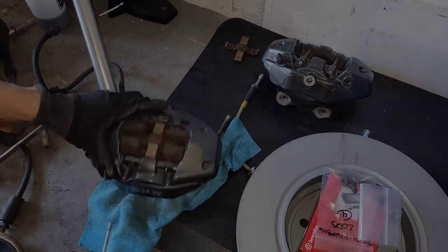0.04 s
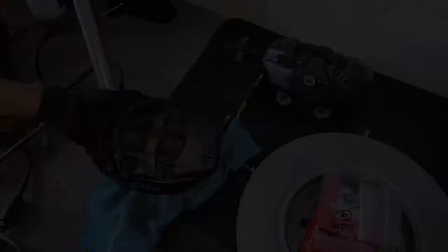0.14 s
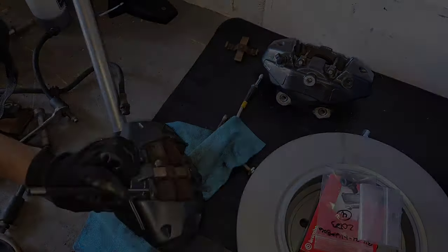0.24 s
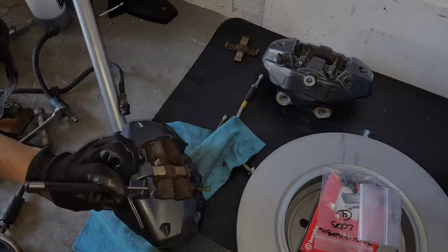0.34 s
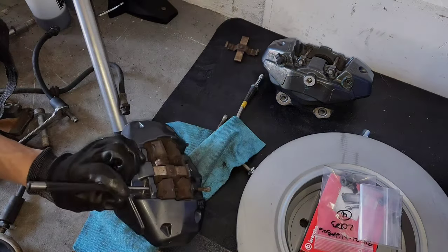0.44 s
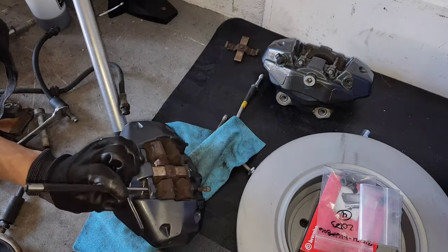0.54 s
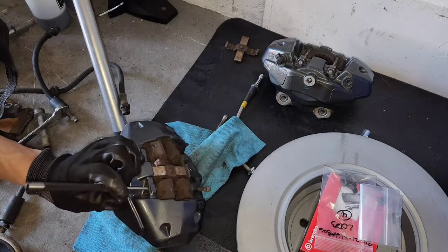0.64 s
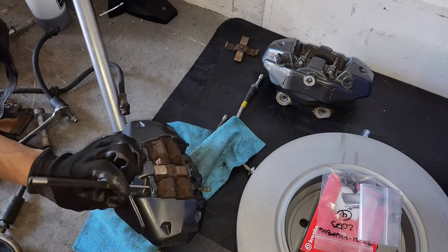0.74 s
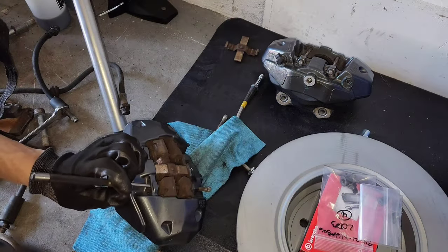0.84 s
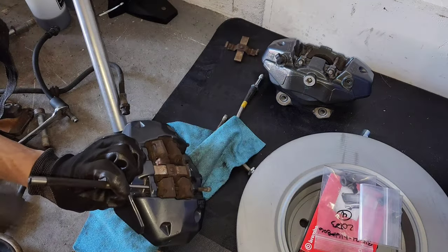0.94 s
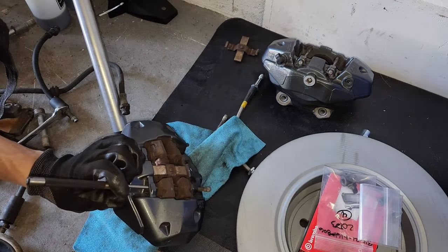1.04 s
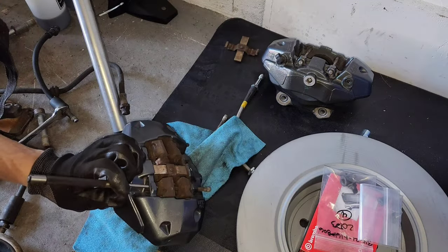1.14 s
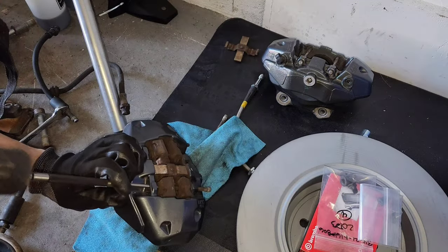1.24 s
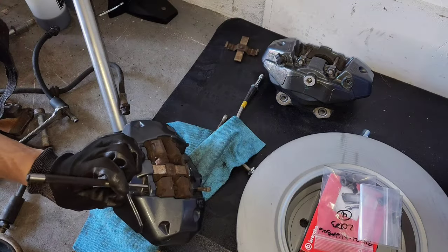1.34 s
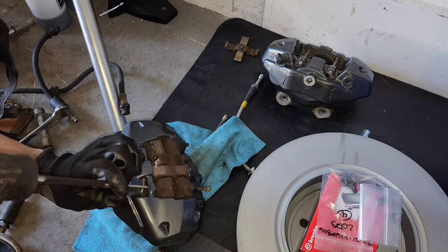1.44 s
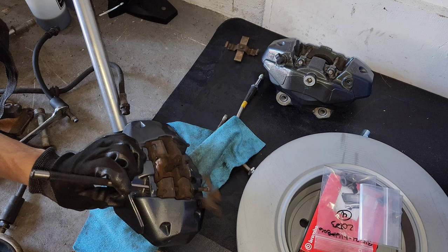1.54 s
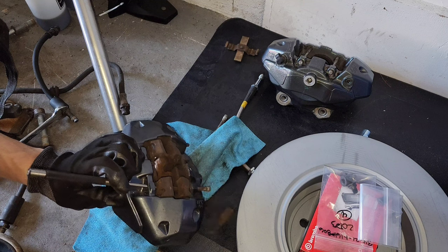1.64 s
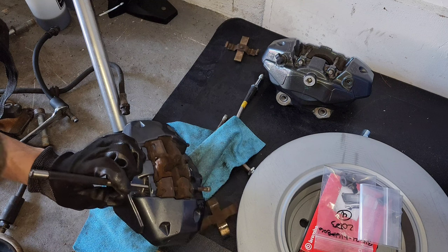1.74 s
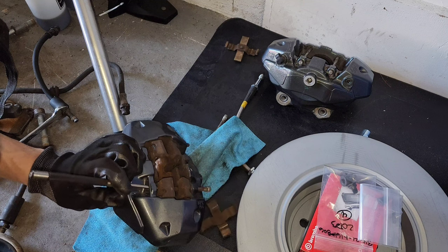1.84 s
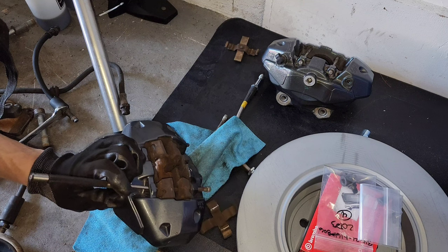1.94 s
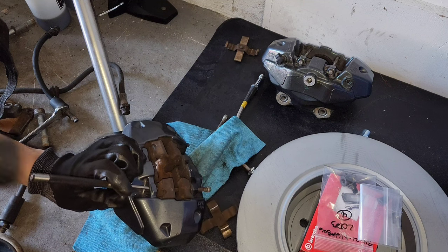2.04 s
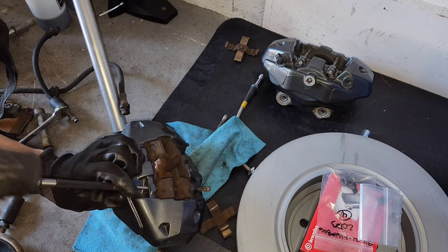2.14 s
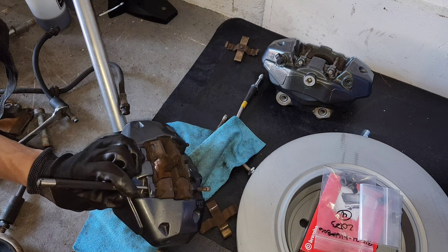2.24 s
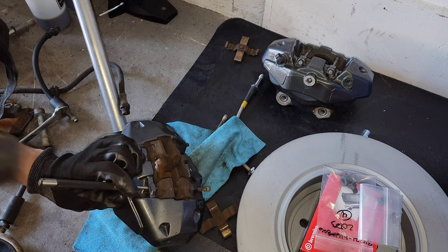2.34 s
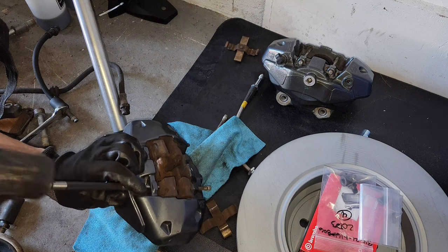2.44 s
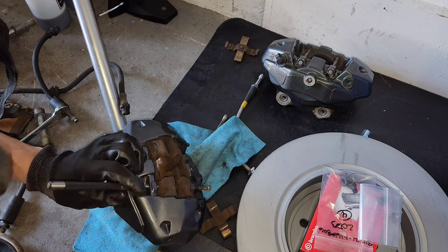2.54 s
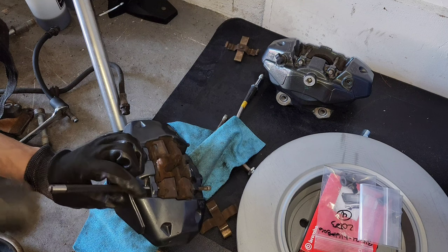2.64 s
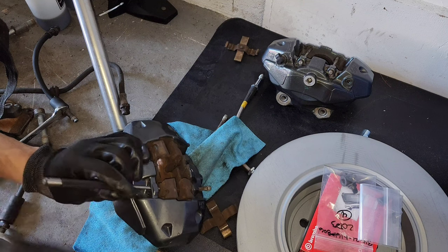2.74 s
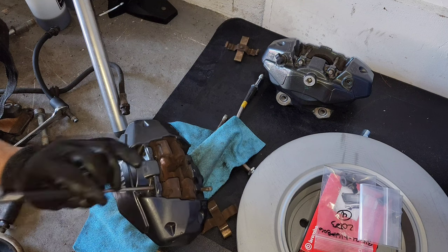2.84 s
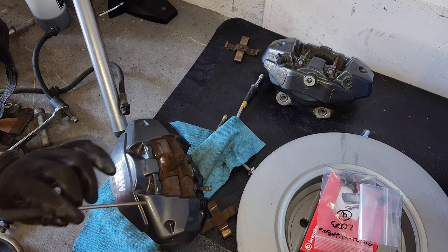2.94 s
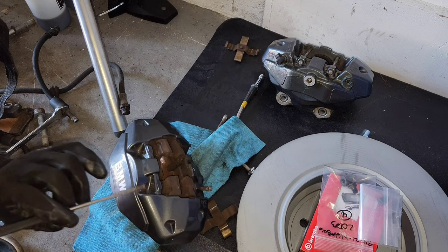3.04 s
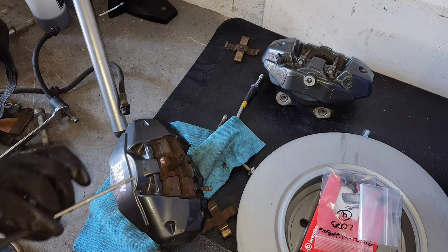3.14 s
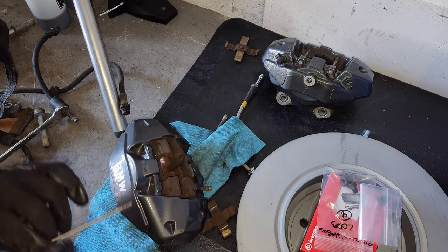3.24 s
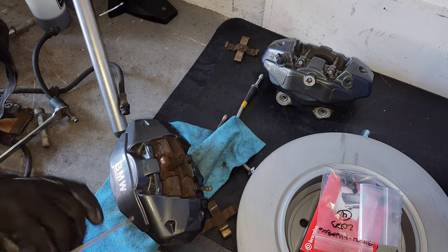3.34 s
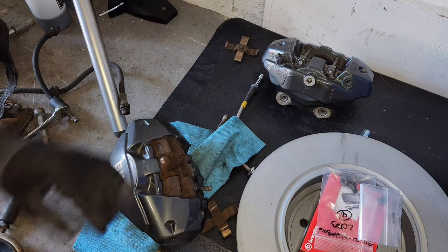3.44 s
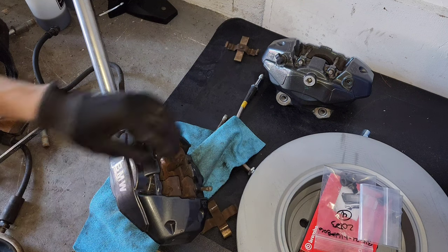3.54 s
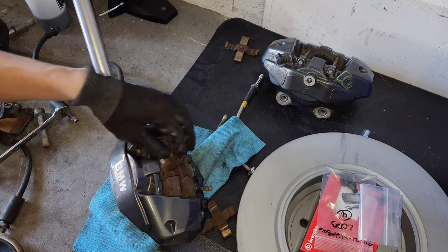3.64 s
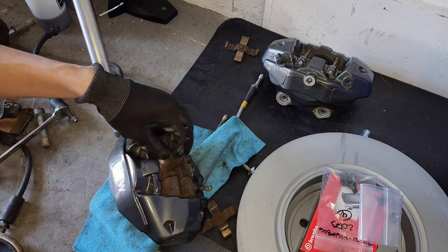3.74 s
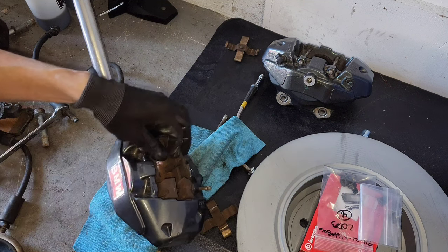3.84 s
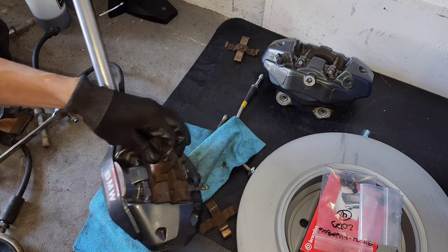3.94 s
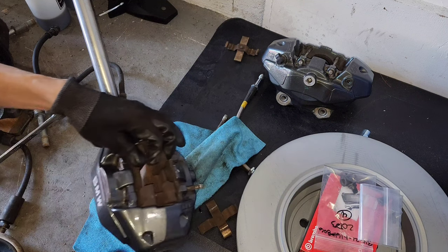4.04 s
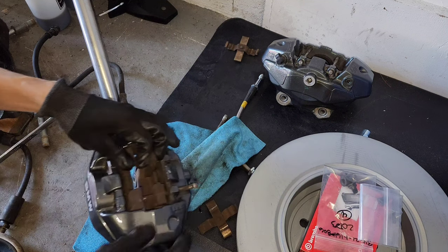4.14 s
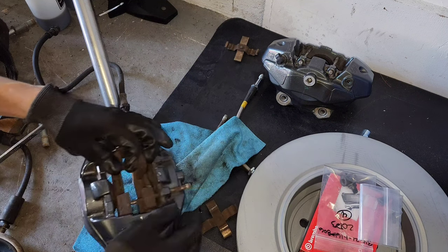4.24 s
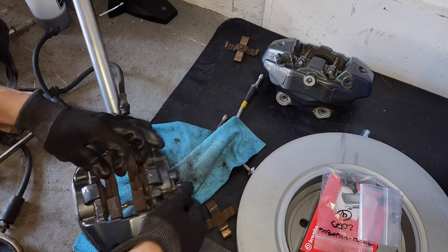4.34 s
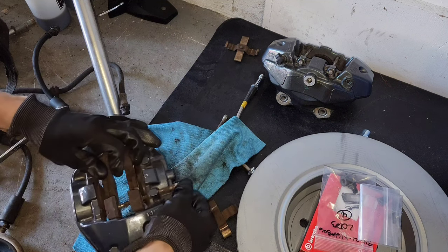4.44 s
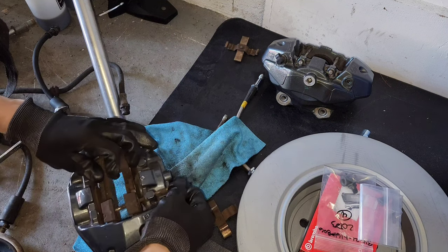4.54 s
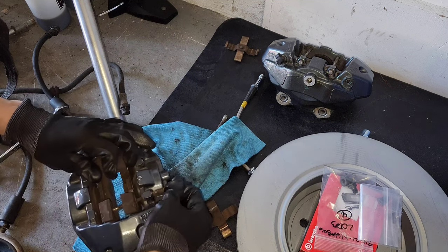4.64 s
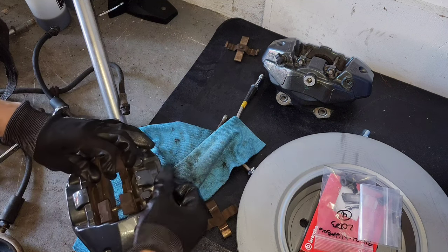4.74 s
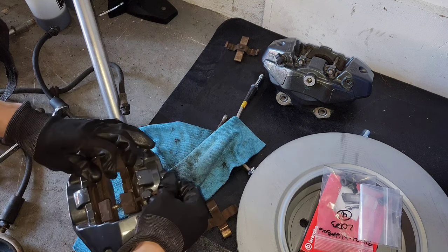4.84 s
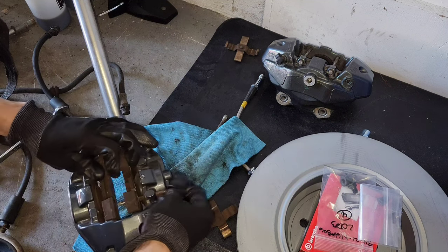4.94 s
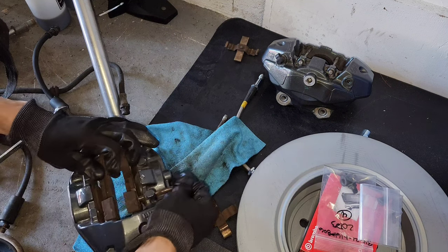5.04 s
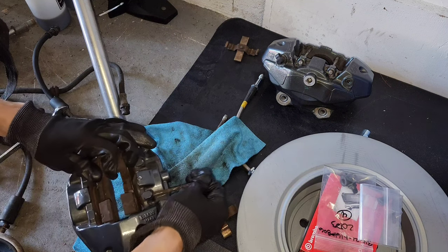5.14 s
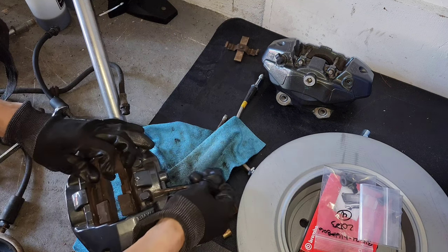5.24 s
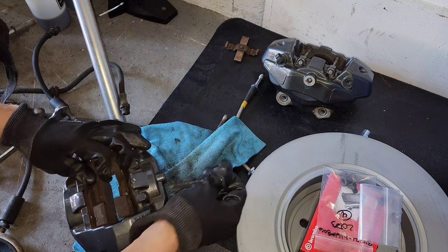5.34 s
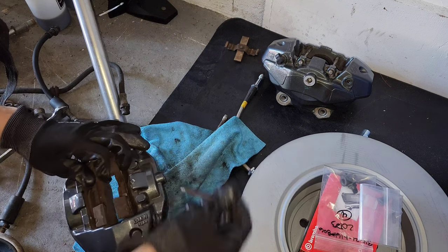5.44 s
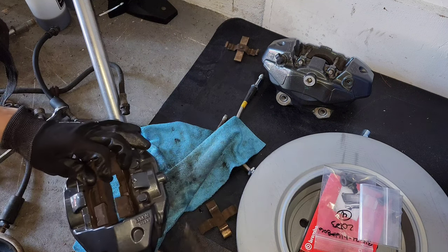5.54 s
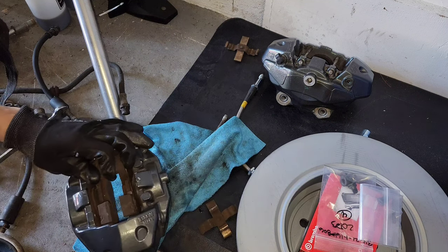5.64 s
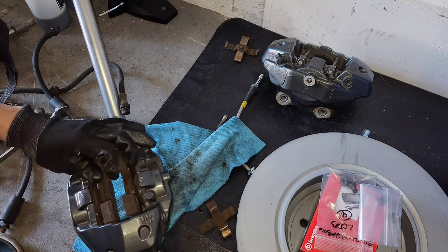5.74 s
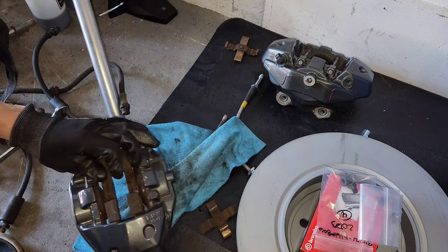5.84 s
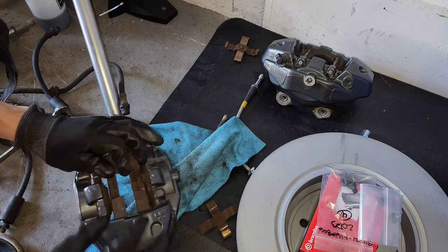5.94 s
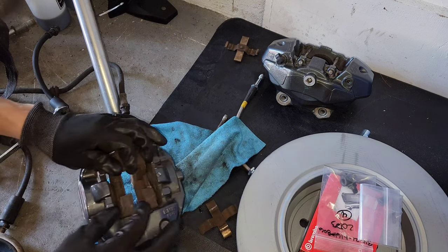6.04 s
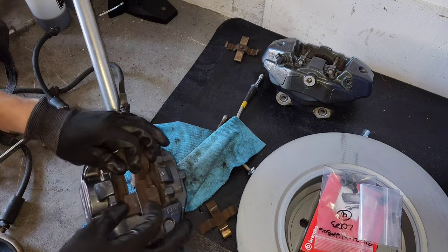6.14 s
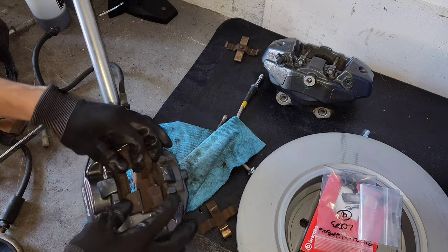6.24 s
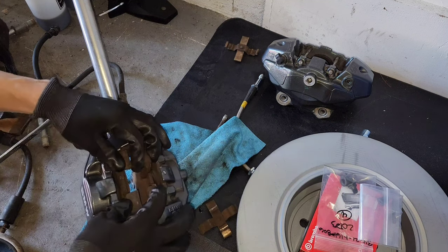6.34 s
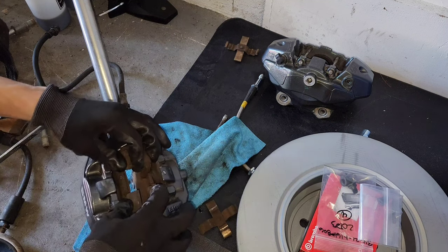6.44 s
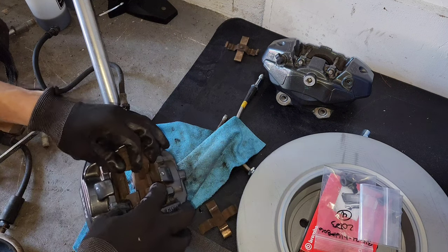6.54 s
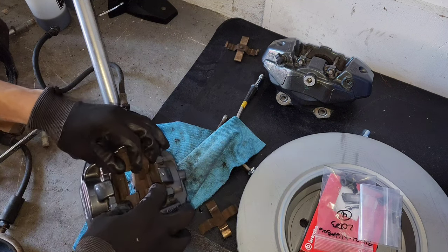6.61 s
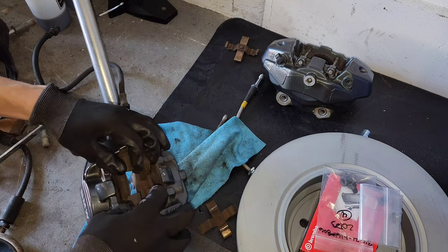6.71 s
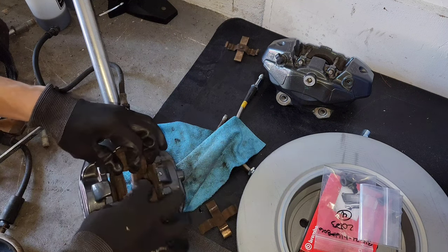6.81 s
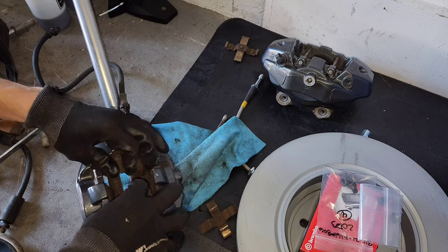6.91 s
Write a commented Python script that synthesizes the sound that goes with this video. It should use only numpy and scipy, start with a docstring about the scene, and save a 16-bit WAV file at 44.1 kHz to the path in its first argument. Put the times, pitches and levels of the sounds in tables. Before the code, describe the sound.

Close stereo pickup on a garage floor with low distant rumble. After a quick fade-out and fade-in, a hammer knocks a punch against a brake caliper; a springy metal clip pops loose and bounces tinnily. More solid knocks follow, the hammer is set down with soft thuds, and a loose steel punch clatters and rings high and clear. Pads scrape and rattle, then a small pin drops with light ticks.

```python
"""A garage floor, close to a two-port camera microphone: a hammer drives a punch against brake caliper pins.
The spring clip bounces, the hammer is laid down, the punch rings as it rolls, pads rattle, a pin is dropped.
Knocks are noise cracks plus body modes; rods are wavering partials; scrapes are slips into resonances.
Gloves, cloth and a low rumble are banded noise. The level fades out at the start, then back in.
"""
import sys
import numpy as np
from scipy import signal
from scipy.io import wavfile
from scipy.ndimage import uniform_filter1d

SR = 44100
rng = np.random.default_rng(int(sys.argv[2]) if len(sys.argv) > 2 else 0)


def dump(signal):
    """Clip the signal to [-1, 1] and save it as 16-bit WAV at the path in sys.argv[1]."""
    limited = np.clip(np.atleast_2d(signal).T, -1, 1)
    pcm = np.round(limited * 32767).astype(np.int16)
    wavfile.write(sys.argv[1], SR, pcm)


N = 307377
TIME_S = np.arange(N) / SR
LEFT_LEAD_S = 0.00018
MID_SIDE = np.array([[1], [-1]])


def undb(db):
    """Amplitude ratio of a level in dB."""
    return 10 ** (np.asarray(db) / 20)


def on_log_hz(table, hz):
    """Second column of a table, interpolated over log frequency."""
    table = np.array(table)
    return np.interp(np.log(hz), np.log(table[:, 0]), table[:, 1])


def band_noise(lo_hz, hi_hz, channels=2):
    """Unrelated noises of rms 1 in a band."""
    band = signal.butter(2, [lo_hz, hi_hz], "band", fs=SR, output="sos")
    x = signal.sosfilt(band, rng.standard_normal((channels, N)))
    return x / x.std()


def walk(rate_hz):
    """Random levels held 1 / rate_hz and slewed twice; spread about 1.7."""
    hold = int(SR / rate_hz)
    steps = np.repeat(rng.standard_normal(N // hold + 1), hold)
    return 2.34 * uniform_filter1d(uniform_filter1d(steps, hold), hold)[:N]


def swell_shape(t, middle_s, length_s):
    """Bell-shaped rise and fall, length_s wide at 1/e."""
    return np.exp(-(2 * (t - middle_s) / length_s) ** 2)


# street and house rumble spectrum: f/Hz, relative density/dB per Hz
RUMBLE_SPECTRUM = [(15, -30), (25, -3), (60, 0.06), (94, -3), (200, -14), (256, -21), (450, -29),
                   (900, -34), (1500, -36), (4000, -47), (8500, -50), (10500, -60), (16000, -65)]
# bass level before trims: t/s, level/dB
RUMBLE_LEVEL = [(0.5, -55), (1.11, -57), (1.17, -52), (2.91, -63), (3.26, -52), (3.33, -58), (5.35, -61),
                (5.42, -55.5), (6.77, -63), (6.86, -52), (6.97, -55.5)]
# likeness of the two ports: f/Hz, likeness/0-1
PORT_LIKENESS = [(50, 1), (150, 0.96), (400, 0.8), (1000, 0.31), (4000, 0.12)]
# hum swells before trim: middle t/s, length/s, level/dB
HUM_SWELLS = [(0.502, 0.66, -55.5), (1.597, 0.31, -61.5), (5.744, 0.1, -56.5)]
# droning bands before trim: f/Hz, width/Hz, level/dB
DRONES = [(61.3, 22, -66.5), (196, 12, -84.5), (346, 52, -84)]


def rumble(flicker_db=1.37, floor_db=-60, bands_trim_db=-9.5, trim_db=2.0):
    """Half-octave bands flicker alone, alike at both ports in the bass, where they swell; machines drone afar."""
    out = np.zeros((2, N))
    swell_db = np.interp(TIME_S, *np.transpose(RUMBLE_LEVEL)) - floor_db
    for hz in 25 * 2 ** np.arange(0, 9.3, 0.5):
        mid, side = band_noise(hz / 2 ** 0.25, hz * 2 ** 0.25)
        alike = np.clip(on_log_hz(PORT_LIKENESS, hz), 0, 1)
        pair = np.sqrt(1 + alike) * mid + np.sqrt(1 - alike) * side * MID_SIDE
        band_db = on_log_hz(RUMBLE_SPECTRUM, hz) + 10 * np.log10(hz / 60)  # density to band level
        band_db = band_db + swell_db * np.clip(2 - hz / 100, 0, 1)
        out += undb(floor_db + bands_trim_db + band_db + flicker_db * walk(8.1)) * pair

    hum_size = undb(-72.5)
    for middle_s, length_s, db in HUM_SWELLS:
        hum_size = hum_size + undb(db) * swell_shape(TIME_S, middle_s, length_s)
    out += hum_size * np.sin(2 * np.pi * 118.2 * TIME_S + walk(6.1))
    for hz, width_hz, db in DRONES:
        drone = band_noise(hz - width_hz / 2, hz + width_hz / 2, channels=1)
        out += undb(db + 0.83 * walk(3.1)) * drone
    return undb(trim_db) * out


# glove and cloth rubs: middle t/s, length/s, level/dB at 3-9 kHz, relative/dB at .8-3 kHz, at 9-16 kHz
RUBS = [(0.001, 0.1, -66.5, -8.5, -17), (0.359, 0.045, -97.5, 25, -43.5), (0.478, 0.11, -67, 7.5, -2.5),
        (0.649, .1, -80, 4.5, -7), (0.83, 0.54, -83, 7.5, -13), (1.05, 0.055, -80, 0, -5),
        (1.27, 0.075, -86, 9.5, 0), (1.4, 0.12, -74.5, -2.5, 0), (2.291, 0.067, -75.5, -4.5, -7.5),
        (2.628, 0.058, -84.5, 4.5, -7), (2.725, 0.042, -67.5, -12, -10), (2.831, 0.25, -73.5, -1.5, -20),
        (3.017, 0.063, -77, 2.5, -11), (3.224, 0.054, -77.5, -2.5, -6), (3.335, 0.075, -71.5, -0.5, -5),
        (3.661, 0.21, -83.5, 5.5, -28.5), (4.339, 0.19, -82.5, 5.5, -22.5), (4.761, 0.052, -82, 8, -22),
        (5.062, 0.093, -66, 0.5, -21), (5.187, 0.074, -80, 9.5, -13), (5.641, 0.063, -87, 6, -21),
        (6.12, 0.068, -85.5, 3.5, -21), (6.79, 0.054, -78, 1, -22.5)]


def rustle(grain_db=1.5):
    """Rubbing: short swells of noise in three bands, each grainy from quick slips."""
    out = np.zeros((2, N))
    bands = [undb(grain_db * walk(150)) * band_noise(lo_hz, hi_hz)
             for lo_hz, hi_hz in [(3000, 9000), (800, 3000), (9000, 16000)]]
    for s, length_s, db, mid_db, top_db in RUBS:
        span = slice(max(int((s - 1.4 * length_s) * SR), 0), int((s + 2.7 * length_s) * SR))
        swell = np.sqrt(2) * undb(db) * swell_shape(TIME_S[span], s, length_s)
        noise = sum(undb(rel_db) * band[:, span] for band, rel_db in zip(bands, [0, mid_db, top_db]))
        out[:, span] += swell * noise
    return out


# crack bands: low f/Hz, high f/Hz
CRACK_BANDS = [(3000, 8000), (200, 800), (800, 3000), (8000, 16000)]


def crack_noise():
    """Noise for the cracks; the right port gets much of the left port's, a little later."""
    grit = np.array([band_noise(lo_hz, hi_hz) for lo_hz, hi_hz in CRACK_BANDS])
    alike = np.array([[0.8], [0.95], [0.85], [0.75]])
    late = np.roll(grit[:, 0], int(LEFT_LEAD_S * SR), axis=1)
    grit[:, 1] = alike * late + np.sqrt(1 - alike ** 2) * grit[:, 1]
    return grit


def knocks(events, modes, grit, rough=1, scatter=1, crack_rise_s=0.002, ring_rise_s=0.0003,
           detune=0, chatter_db=0, spread_db=2, stop_s=0.06, crack_db=-10):
    """Each contact is a fading crack in four bands and rings the body's modes, in a new mix and phase."""
    out, t = np.zeros((2, N)), np.arange(SR // 4) / SR
    # loose parts tumble and chatter, so the size and phase of every mode wander
    wander, chatter = walk(160), walk(500)
    next_events = events[1:] + [[np.inf]]
    for (s, level_db, low_db, mid_db, top_db, t60_s, pan_db, *ring_db), after in zip(events, next_events):
        start = int(s * SR)
        span = slice(start, min(start + len(t), N))
        length = span.stop - start
        chatter_size_db = chatter_db * (1.5 - np.exp(-t / 0.0098)) * chatter[start % SR:][:len(t)]
        fade = (1 - np.exp(-t / crack_rise_s)) * undb(-60 * t / max(t60_s, 0.01) + chatter_size_db)
        band_sizes = undb([0, low_db, mid_db, top_db])
        crack = np.einsum("b,bcn->cn", band_sizes, grit[:, :, span])
        sound = undb(crack_db) * crack * fade[:length]

        colour = [(500, low_db), (1500, mid_db), (5000, 0), (11000, top_db)]
        # the next contact damps what still rings
        damping_db = -60 * np.clip(t - (after[0] - s), 0, None) / stop_s
        envelope = (1 - np.exp(-t / ring_rise_s)) * undb(damping_db)
        for hz, db, mode_t60_s in modes:
            chance, (size_at, phase_at, turn) = rng.standard_normal(3), rng.random(3)
            hz = hz * (1 + detune * chance[2])  # held and loaded differently at every contact
            lead = 2 * np.pi * hz * LEFT_LEAD_S + min(hz / 4000, 1) * chance[1]
            size_walk = wander[int(size_at * (N - SR)):][:len(t)]
            phase_walk = wander[int(phase_at * (N - SR)):][:len(t)]
            mode_db = ring_db[0] + db + on_log_hz(colour, hz) + spread_db * chance[0]
            size = envelope * undb(mode_db + 2.2 * rough * size_walk - 60 * t / mode_t60_s)
            phase = 2 * np.pi * (hz * t + scatter * turn) + rough * phase_walk
            sound += (size * np.sin(phase + np.array([[lead], [0]])))[:, :length]
        pan = undb(np.array([[pan_db / 2], [-pan_db / 2]]))
        out[:, span] += undb(level_db) * pan * sound
    return out


def rod(contacts, pitches_hz, partials, held_until_s=0, held_share=1, waver_hz=50, roll=3):
    """Every contact rings the partials anew; rolling makes them waver and shifts them between the ports."""
    out = np.zeros((2, N))
    for hz, (db, t60_s, side_db, waver_db) in zip(pitches_hz, partials):
        phase = 2 * np.pi * (hz * TIME_S + rng.random()) + waver_db / 6 * walk(waver_hz)
        side = undb(side_db) * np.cos(phase + roll * walk(27))
        size = np.sqrt(2) * undb(db + waver_db * walk(waver_hz))
        tone = size * (np.sin(phase) + side * MID_SIDE)
        for (s, *_, ring_db, favoured_hz, slope_db), after in zip(contacts, contacts[1:] + [[np.inf]]):
            span = slice(int(s * SR), int(min(s + 1, after[0] + 0.2) * SR))
            t = TIME_S[span]
            ring_s = t60_s * (held_share if s < held_until_s else 1)
            # each ring takes over from the one before on a scale of 32 cycles
            rise = 1 - np.exp(-np.clip(t - s, 0, None) * hz / 32)
            cut = np.exp(-np.clip(t - after[0], 0, None) * hz / 32)
            pitch_db = -slope_db * abs(np.log2(hz / favoured_hz))
            out[:, span] += rise * cut * undb(ring_db + pitch_db - 60 * (t - s) / ring_s) * tone[:, span]
    return out


# punch contacts; the first row is a faint ring already sounding at the start: t/s, level/dB,
# relative/dB at .2-.8, .8-3, 8-16 kHz, crack t60/s, left minus right/dB,
# ring/dB, favoured f/Hz, slope/dB lost per octave
PUNCH_CONTACTS = [(0.003, -117.5, -13.5, -8, 4, 0.064, -24, -62, 2160, 1.1),
                  (2.705, -55, -28, -8, -19, 0.045, 23, -79, 5000, 1),
                  (2.757, -55.5, -26, -11, -9, 0.049, 18, -70, 9250, 2.4),
                  (2.79, -60, -9, 5.5, -10, 0.027, 19, -58.5, 3700, 9.6),
                  (2.83, -52, 2.5, 4, -19, 0.047, 2, -65.5, 9250, 2),
                  (2.8824, -71, -8, 11.5, -18, 0.098, 18, -48.5, 3200, 17.5),
                  (2.918, -89.5, -1.5, -2.5, -2, 0.03, 2, -75, 3700, 14),
                  (3.731, -48.5, -12.5, -16, -12, 0.2, 6, -63, 6600, 1.6),
                  (3.769, -30, -30, -2, 12.5, 0.034, 5.5, -29, 10880, 5.2),
                  (3.795, -46.5, -22.5, -18.5, -1, 0.046, -3.5, -25, 5000, 9),
                  (3.819, -33.5, -22, -19.5, 1.5, 0.035, -3.5, -21.5, 4990, 13),
                  (3.853, -46.5, -16, 4, 13, 0.038, 0.5, -27, 9000, 7.1),
                  (3.8626, -35.5, -13.5, -9, 9, 0.056, 2, -29.5, 11000, 9),
                  (3.878, -55, -16, -6, 2, 0.03, -1, -27, 9250, 8.5),
                  (3.895, -52.5, -17, 1, 3.5, 0.0403, -4, -33.5, 9390, 8.5),
                  (3.927, -47.5, -33, -3.5, 10.5, 0.02, 22, -51.5, 9250, 2.2),
                  (3.937, -39, -18, -3.5, -14, 0.021, 12, -37.5, 9430, 3.3),
                  (3.9928, -66, 4, 13, -16, 0.13, -2, -45.5, 2200, 0.93),
                  (4.045, -73, 13, 21, -20, 0.057, 1, -52, 2210, 1),
                  (4.2655, -67.5, 26.5, 22.5, -36, 0.025, 3, -80, 13000, 6.3)]
# punch pitches: f/Hz
PUNCH_HZ = [2211, 3681, 6602, 9252, 13074, 13177]
# punch partials, one row a pitch: level/dB, t60/s, side minus mid/dB, waver/dB
PUNCH_PARTIALS = [(-12, 1, -1, 1), (-2, 0.31, -4.5, 0.9), (-9.5, 0.39, 8, 3.5), (1, 0.42, -2.5, 1.06),
                  (-3, 0.4, -2, 2.5), (-1, 0.62, -4.5, 1)]


def punch_ticks(grit):
    """Cracks of the punch's contacts."""
    return knocks(PUNCH_CONTACTS, [], grit, crack_rise_s=0.0005, chatter_db=2.5)


def punch_ring():
    """Partials of the loose steel punch; until 3.5 s fingers shorten its ring."""
    return rod(PUNCH_CONTACTS, PUNCH_HZ, PUNCH_PARTIALS, held_until_s=3.5, held_share=0.36, waver_hz=75)


# hammer blows: t/s, level/dB, relative/dB at .2-.8, .8-3, 8-16 kHz, crack t60/s, left minus right/dB, ring/dB
BLOWS = [(1.1785, -58, 17.5, 11, -6, 0.026, 2, -2.5), (1.183, -39, -9.5, 3.5, -5, 0.06, 2.5, -1.5),
         (2.0576, -32.5, -0.5, 2, -0.5, 0.045, 6.4, -4.5), (2.1003, -39, -32, -9, -1, 0.017, 0.25, 6),
         (2.1055, -43.5, -32, -15, -5, 0.06, 0.25, -9), (2.3615, -33.5, -6.5, -2.5, -7, 0.087, 3, 4.5)]
# caliper modes: f/Hz, level/dB, t60/s
CALIPER_MODES = [(340, -2, .045), (480, -2, .04), (1440, -8, .03), (2310, -9, .02), (2950, -7, .018),
                 (4170, -10, .016), (5240, -13, .014), (6400, -10, .016), (8520, -11, .016),
                 (13100, -11, .022)]


def caliper_blows(grit):
    """Blows crack and ring the caliper's short-lived modes."""
    return knocks(BLOWS, CALIPER_MODES, grit, rough=1.3, ring_rise_s=0.00073, detune=0.02, chatter_db=2.5)


# clip bounces: t/s, level/dB, relative/dB at .2-.8, .8-3, 8-16 kHz, crack t60/s, left minus right/dB, ring/dB
SPRING_BOUNCES = [(1.421, -36, 9, 6, 4, 0.029, 1.5, -12), (1.425, -24.5, -15.5, -3, 5.5, 0.075, -0.5, -11),
                  (1.5265, -46.5, -35, -2, 17.5, 0.14, 0.5, -8),
                  (1.6052, -35.5, 10.5, 4.5, -19, 0.021, 0, -18.5),
                  (1.6112, -30.5, -19, -2.5, 9, 0.071, 0.5, -11),
                  (1.6985, -53, 19, 23.5, 13, 0.035, -0.5, -24),
                  (1.7444, -54.5, 25.5, 20.5, 2, 0.048, 1.5, -14),
                  (1.761, -49, 19.5, 13.5, -2, 0.045, -4, -19), (1.7735, -58, 26, 19, -6, 0.022, -1, -12.5),
                  (1.8225, -56, 12.5, -14, -14, 0.068, 4, -27), (1.862, -69.5, 23, 5, -9, 0.066, 0, -18),
                  (1.9297, -73.5, 26, 22, -13, 0.051, 3, -15)]
# clip modes: f/Hz, level/dB, t60/s
SPRING_MODES = [(285, -6.5, 0.0592), (489, 0, 0.04), (592.4, 1, 0.059), (1790, -6, 0.13),
                (2540, -8.5, 0.15), (3144, -4, 0.4), (3594, -4.5, 0.2), (4080, -10.5, 0.22),
                (4500, -1.5, .07), (4936, -10.5, 0.17), (5433, -6.5, 0.32), (6310, -9, 0.24),
                (6705, -11, 0.171), (7000, -4.5, 0.12), (7716, -0.5, 0.22), (8300, -5, 0.23),
                (8710, -1.5, 0.13), (9000, -2, 0.17), (9590, -4.5, .3), (10350, -11.5, 0.26),
                (11550, -1, 0.19), (12020, 1.5, .15), (12550, -4.5, 0.11), (13320, -10.5, 0.15),
                (13705, -12.5, .28), (14440, -12, .12), (15540, -4, .13)]


def spring_bounces(grit, lesser_count=30):
    """The thin sheet rings strong modes and many weaker ones scattered through the treble."""
    places = (np.arange(lesser_count) + rng.random(lesser_count)) / lesser_count
    lesser_modes = [(hz, -9.5, 0.12) for hz in 2600 + 13000 * places]
    return knocks(SPRING_BOUNCES, SPRING_MODES + lesser_modes, grit, rough=0.7, crack_rise_s=0.0007,
                  detune=0.002, chatter_db=2.0)


# clip rocking to rest: t/s, ring/dB, favoured f/Hz, slope/dB lost per octave
SPRING_ROCKS = [(1.605, -30, 800, 24), (1.643, -44, 800, -4), (1.665, -43, 810, -5.5),
                (1.70, -55, 1120, 23), (1.76, -43.5, 1040, 24), (1.825, -63, 1000, 13),
                (1.872, -44, 1105, 27), (2.04, -61, 795, 28)]
# arm pitches: f/Hz
SPRING_ARM_HZ = [795, 1122, 1610]
# arm partials, one row a pitch: level/dB, t60/s, side minus mid/dB, waver/dB
SPRING_ARM_PARTIALS = [(-12, 0.94, -5.5, 2.8), (-12, 0.4, -4.5, 2.5), (-9.5, 0.17, 0.5, 2.7)]


def spring_arms():
    return rod(SPRING_ROCKS, SPRING_ARM_HZ, SPRING_ARM_PARTIALS, waver_hz=110)


# steel over steel: start t/s, loudest t/s, end t/s, rate/slips per s, level/dB at these three times,
# favoured f/Hz, slope/dB lost per octave
SCRAPES = [(2.694, 2.702, 2.745, 512, -60, -43, -62, 2800, 3.3),
           (2.749, 2.749, 2.79, 500, -62, -44, -59, 4100, 7.4),
           (2.785, 2.797, 2.83, 396, -59, -58, -62, 3600, 8),
           (2.83, 2.842, 2.875, 400, -43, -50, -73, 3500, 2.9),
           (4.866, 4.885, 4.924, 490, -55, -46.5, -47, 2990, 3.5),
           (4.922, 4.93, 5.015, 600, -52, -38, -66, 3500, 13),
           (5.021, 5.05, 5.12, 873, -56, -34, -73, 2830, 7.3)]
# scraped resonances: f/Hz, width/Hz, level/dB
SCRAPE_RESONANCES = [(1200, 85, -5), (1626, 280, -7), (2810, 72, 13.5), (3200, 240, 4.5), (3540, 60, 7.5),
                     (4000, 86, 4.5), (4590, 90, -4.5), (6100, 90, -5.5)]


def scrapes(scatter_db=2):
    """Uneven stick-slip clicks into a few resonances, most of them narrow."""
    rung, catching = np.zeros(N), undb(1.5 * walk(200))  # the scrape catches and lets go
    for start_s, loudest_s, end_s, rate_hz, *levels_db, favoured_hz, slope_db in SCRAPES:
        span = slice(int(start_s * SR), int(end_s * SR))
        chance = rng.random((2, span.stop - span.start))
        level_db = np.interp(TIME_S[span], [start_s, loudest_s, end_s], levels_db)
        size = undb(level_db - scatter_db * np.log(chance[1])) * np.sqrt(SR / rate_hz)
        slips = (chance[0] < rate_hz / SR) * size * catching[span]
        slips = np.pad(slips, (0, SR // 20))  # room to ring out
        for k, (hz, width_hz, db) in enumerate(SCRAPE_RESONANCES):
            gain = (-1) ** k * undb(db - slope_db * abs(np.log2(hz / favoured_hz)))
            resonance = signal.lfilter(*signal.iirpeak(hz, hz / width_hz, SR), slips)
            rung[span.start:span.start + len(slips)] += gain * resonance
    return np.array([rung, np.roll(rung, int(LEFT_LEAD_S * SR))])


# hammer contacts: t/s, level/dB, relative/dB at .2-.8, .8-3, 8-16 kHz, crack t60/s, left minus right/dB, ring/dB
HAMMER_CONTACTS = [(2.9118, -65, 22, 2, -12, 0.028, 0.086, 1.5),
                   (3.0275, -63.5, 33.8, 14, -28, 0.029, 1.0, -5.5),
                   (3.0795, -55.5, 22.8, 23.3, 7, 0.035, 0.97, -1),
                   (3.2081, -54, 22.6, 11.2, -9, 0.049, 0.74, -11)]
# hammer modes: f/Hz, level/dB, t60/s
HAMMER_MODES = [(184, -2.5, .04), (342, -2, 0.035), (524, -5, 0.022), (820, -7, 0.035), (1110, -0.5, 0.037),
                (1352, -5, 0.13), (1580, 0.5, 0.024), (2100, -2, 0.052), (2350, -5, 0.046), (4050, -9, .1)]


def hammer_down(grit):
    """The hammer laid down: low modes with little scatter in phase."""
    return knocks(HAMMER_CONTACTS, HAMMER_MODES, grit, rough=0.3, scatter=0.2, crack_rise_s=0.00042)


# pad rattles: t/s, level/dB, relative/dB at .2-.8, .8-3, 8-16 kHz, crack t60/s, left minus right/dB, ring/dB
PAD_RATTLES = [(3.5872, -71, 14, 23.5, -11.5, 0.14, 0.5, -19), (4.7386, -57, -9, 3.5, -25, 0.058, 12, -15),
               (4.7646, -76.5, 0, -8, -21, 0.024, 5, -4.5), (4.8635, -38, -47, -5.5, -1.5, 0.11, 1.5, 8.5),
               (4.9349, -39, -9.5, -0.5, -9, 0.12, 1.9, 10.5), (5.0265, -47, -20, 1.5, -10, 0.1, 6, -6),
               (5.1916, -48, -25, 3.5, -22, 0.037, 7.6, -27), (5.3066, -73, -1.5, 20, -25, 0.058, 7, -4),
               (6.8175, -51, -26, -43, -12, 0.052, 8, 10.5)]
# pad modes: f/Hz, level/dB, t60/s
PAD_MODES = [(1185, -13, 0.039), (2420, -14.5, 0.029), (2730, -11.5, 0.067), (3174, -2, 0.027),
             (3460, -0.5, 0.036), (3976, -10, 0.032), (5990, -7.5, 0.016)]


def pad_rattles(grit):
    """Loose pads knock with a soft onset and rough, short modes."""
    return knocks(PAD_RATTLES, PAD_MODES, grit, rough=1.17, crack_rise_s=0.0037, ring_rise_s=0.0022,
                  detune=0.012)


# pin contacts: t/s, level/dB, relative/dB at .2-.8, .8-3, 8-16 kHz, crack t60/s, left minus right/dB,
# ring/dB, favoured f/Hz, slope/dB lost per octave
PIN_CONTACTS = [(5.668, -52.5, 17.5, 19, 9, 0.054, -0.5, -58, 11900, 40),
                (5.69, -60.5, 12, 17.5, 11, 0.085, 2, -87.5, 2600, 1.5),
                (5.7196, -52.5, 0, -20, 5.5, 0.075, -2, -61, 4550, 1.8),
                (5.772, -63, -22.5, -6, 25.5, 0.041, 2, -70, 12000, 4.1),
                (5.797, -74, -8, -7, 0, 0.03, 0, -57, 7740, 11),
                (5.83, -75, -8, -5, 0, 0.026, -2, -58.5, 7660, 15),
                (5.857, -82, -10, -1, 0, 0.03, 0, -76.5, 7800, 24)]
# pin pitches: f/Hz
PIN_HZ = [2594, 7826, 11910, 14550]
# pin partials, one row a pitch: level/dB, t60/s, side minus mid/dB, waver/dB
PIN_PARTIALS = [(14, 0.088, -9, 1.7), (6.5, 0.39, 0.5, 2.4), (-10.5, 0.18, -6.5, 4.7), (-5, 0.27, 1, 2.3)]


def pin_ticks(grit):
    """Cracks of the dropped pin's contacts."""
    return knocks(PIN_CONTACTS, [], grit, chatter_db=1.0)


def pin_ring():
    """Partials of the dropped pin."""
    return rod(PIN_CONTACTS, PIN_HZ, PIN_PARTIALS)


# wall reverberation: f/Hz, t60/s
GARAGE_T60 = [(200, 0.19), (1000, 0.39), (4000, 0.33), (12000, 0.075)]


def garage(x, level_db=-7):
    """Walls answer after a few ms with a noise tail, shortest in the top treble, different at each port."""
    t, tail = np.arange(SR) / SR, np.zeros((2, SR))
    for hz in 180 * 2.0 ** np.arange(7):
        t60_s = on_log_hz(GARAGE_T60, hz)
        noise = band_noise(hz / np.sqrt(2), min(hz * np.sqrt(2), 20000))[:, :SR]
        tail += np.sqrt(hz / t60_s) * noise * undb(-60 * t / t60_s)
    tail *= 1 - np.exp(-(t / 0.0046) ** 2)
    tail /= np.sqrt((tail ** 2).sum(1, keepdims=True))
    return undb(level_db) * signal.fftconvolve(x, tail, axes=1)[:, :N]


def fade(dark_s=0.125, light_s=0.15, length_s=0.3, power=0.94):
    """Gain falling to silence at dark_s and rising from light_s."""
    distance_s = np.maximum(dark_s - TIME_S, TIME_S - light_s)
    return np.clip(distance_s / length_s, 0, 1) ** power


def scene():
    """Sum all sources; the walls answer the knocks, rattles and scrapes only."""
    grit = crack_noise()
    hits = (punch_ticks(grit) + caliper_blows(grit) + spring_bounces(grit)
            + hammer_down(grit) + pin_ticks(grit))
    handling = scrapes() + pad_rattles(grit)
    rings = punch_ring() + spring_arms() + pin_ring()
    # rattles and scrapes reach the walls more weakly than the knocks
    walls = garage(hits + undb(-13) * handling)
    return fade() * (rumble() + rustle() + hits + handling + rings + walls)


def record(dry, top_hz=16300):
    """The camera cuts the top."""
    return signal.sosfilt(signal.ellip(8, 0.2, 70, top_hz, fs=SR, output="sos"), dry)


dry = scene()
out = record(dry)
dump(out)
```